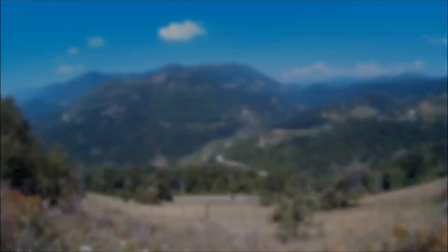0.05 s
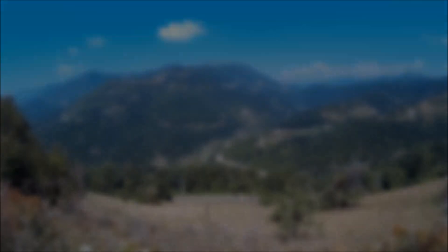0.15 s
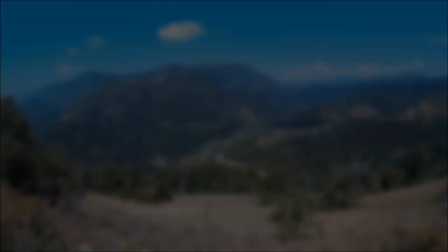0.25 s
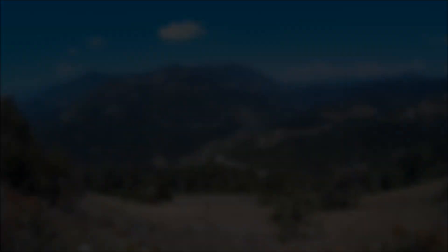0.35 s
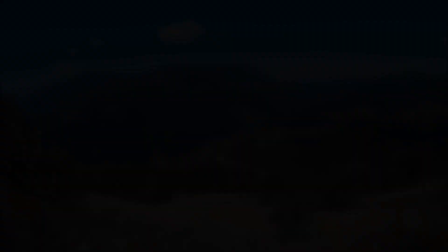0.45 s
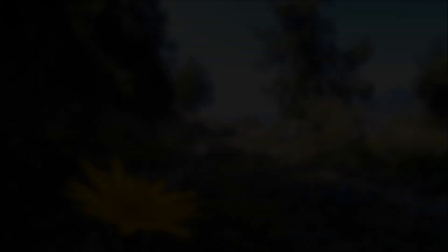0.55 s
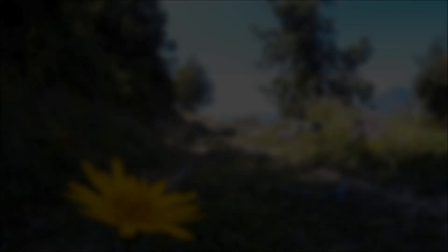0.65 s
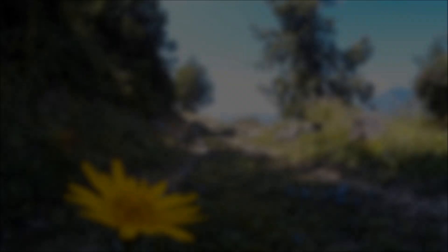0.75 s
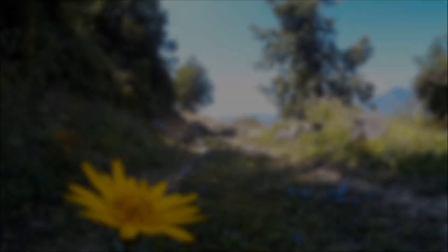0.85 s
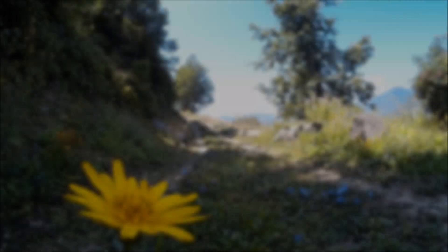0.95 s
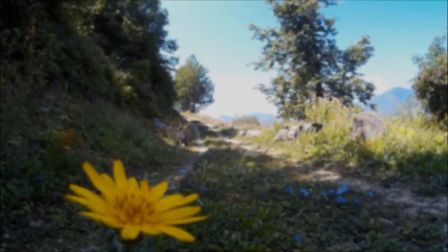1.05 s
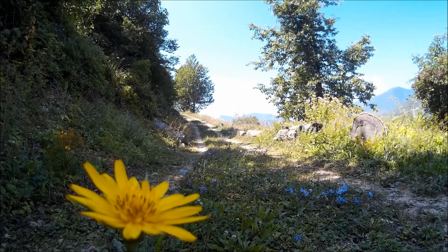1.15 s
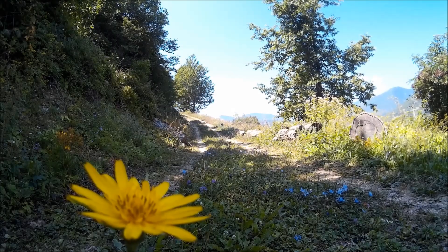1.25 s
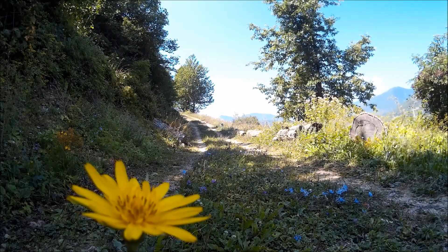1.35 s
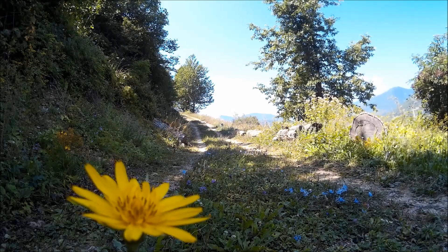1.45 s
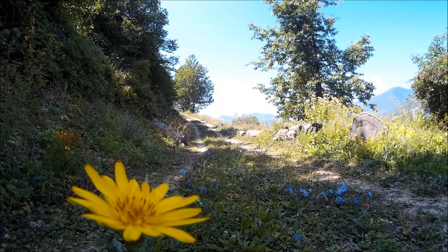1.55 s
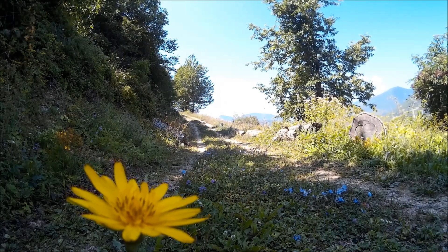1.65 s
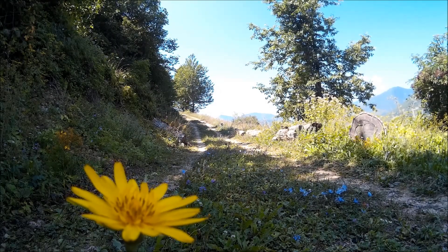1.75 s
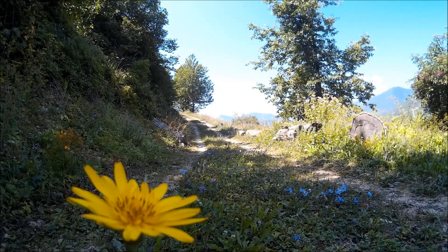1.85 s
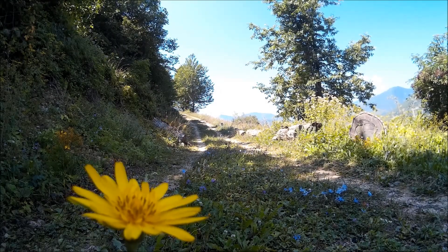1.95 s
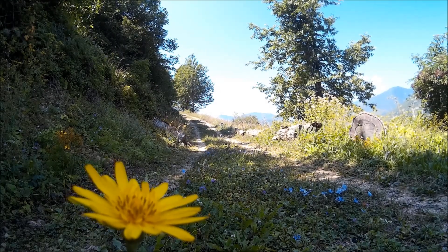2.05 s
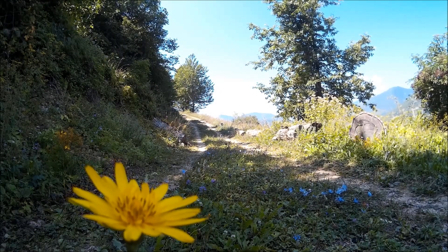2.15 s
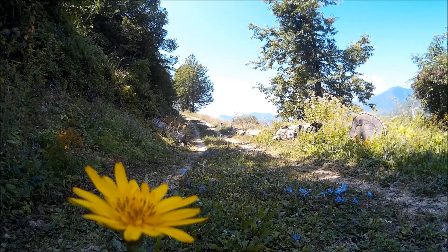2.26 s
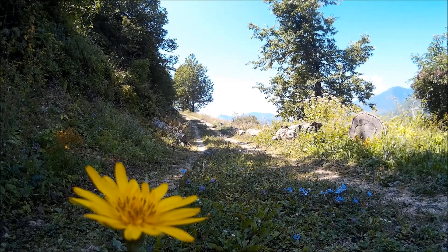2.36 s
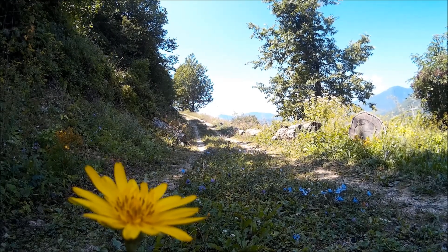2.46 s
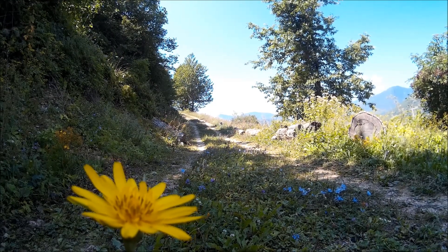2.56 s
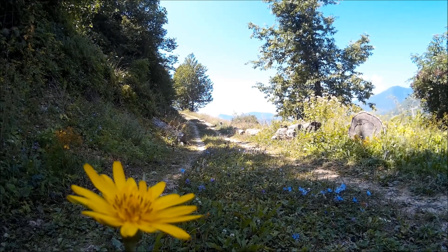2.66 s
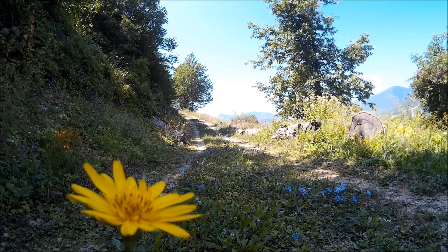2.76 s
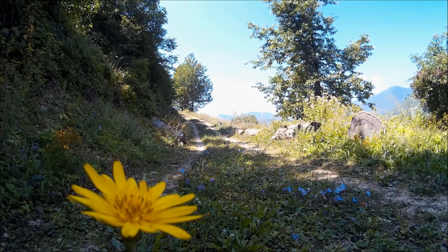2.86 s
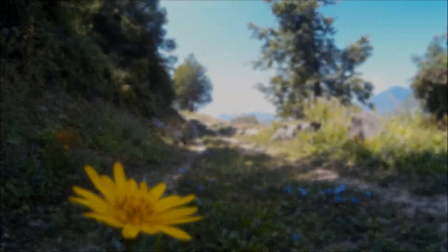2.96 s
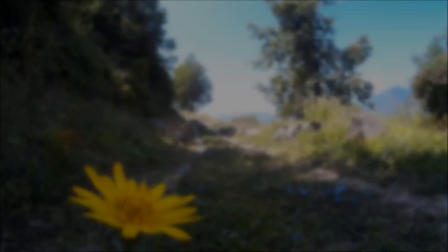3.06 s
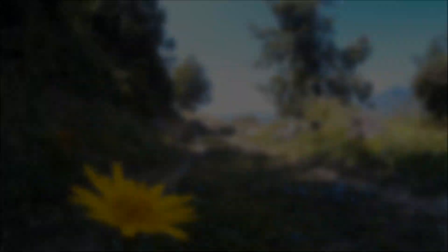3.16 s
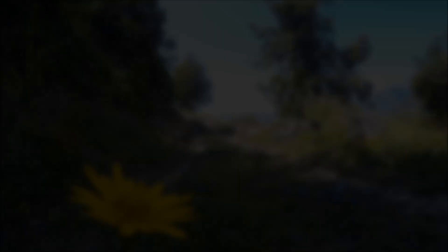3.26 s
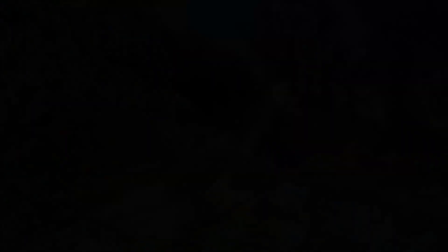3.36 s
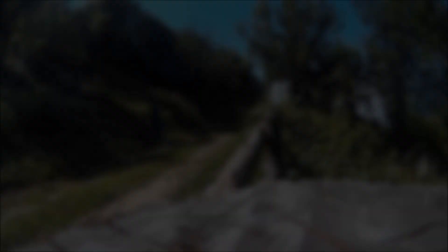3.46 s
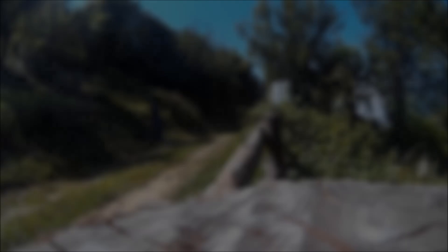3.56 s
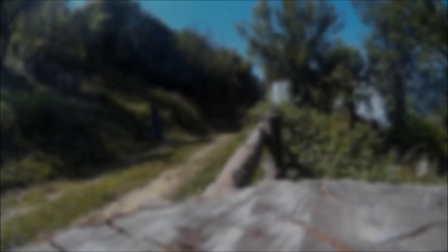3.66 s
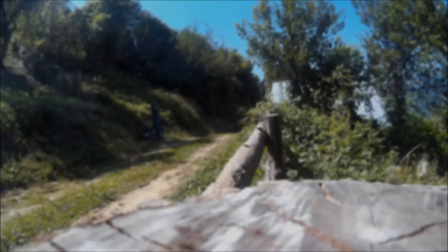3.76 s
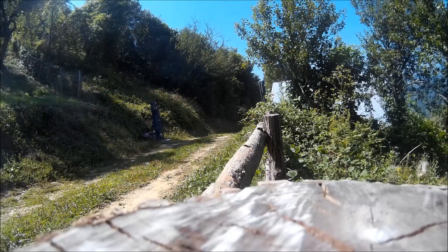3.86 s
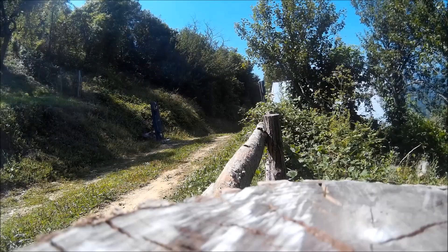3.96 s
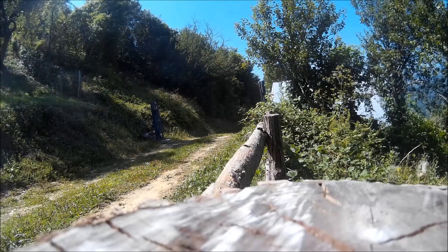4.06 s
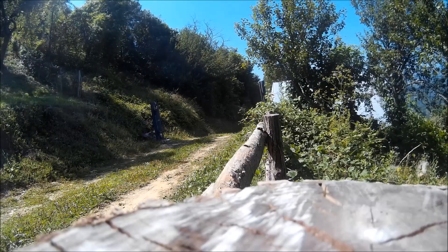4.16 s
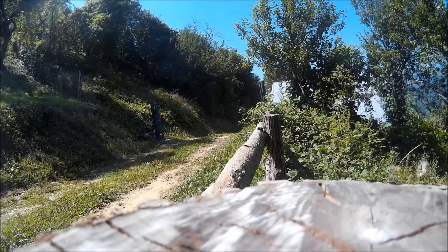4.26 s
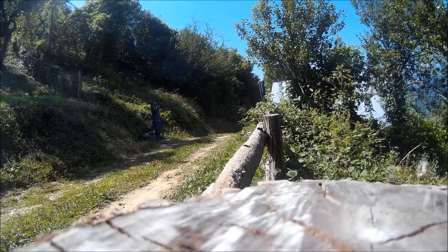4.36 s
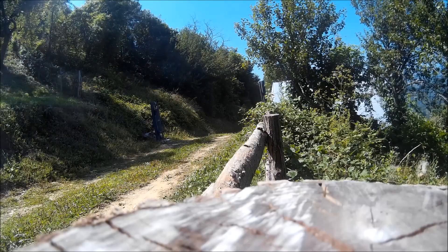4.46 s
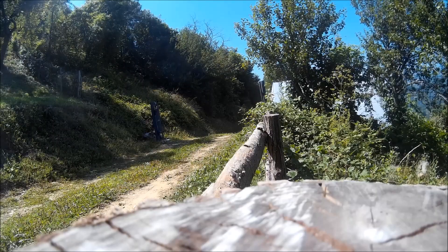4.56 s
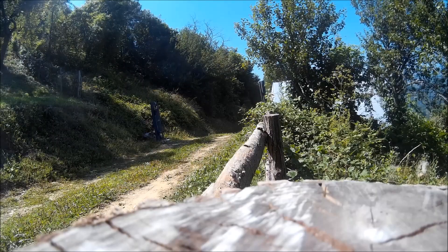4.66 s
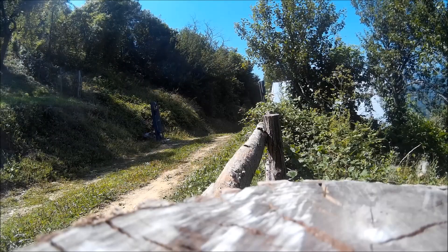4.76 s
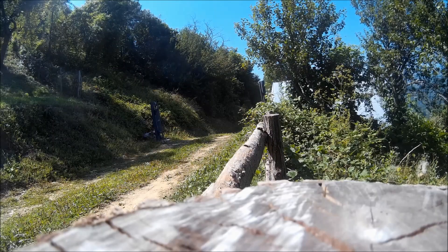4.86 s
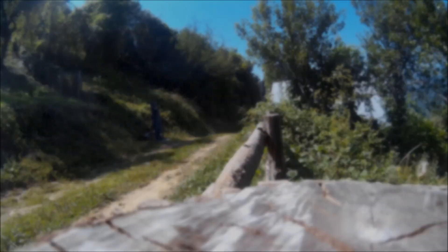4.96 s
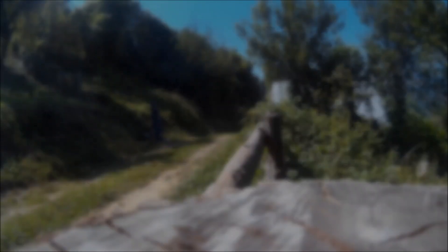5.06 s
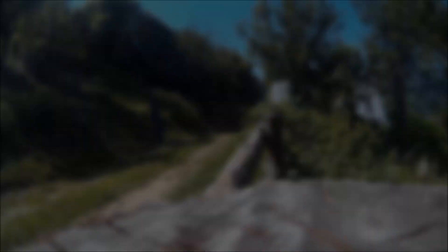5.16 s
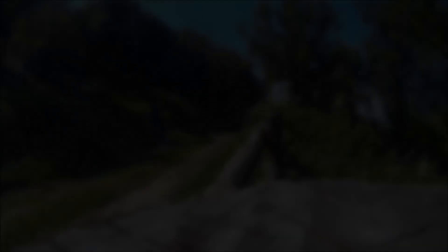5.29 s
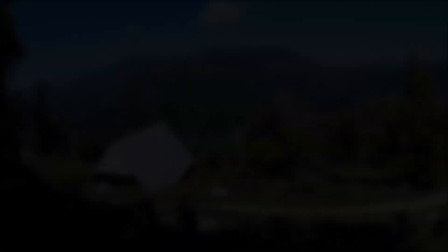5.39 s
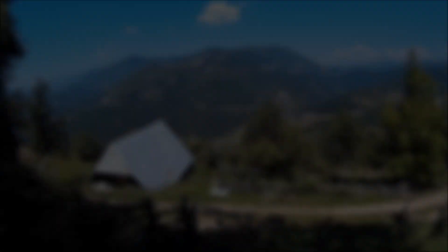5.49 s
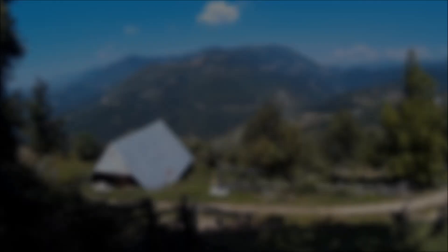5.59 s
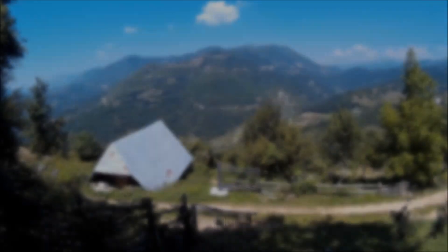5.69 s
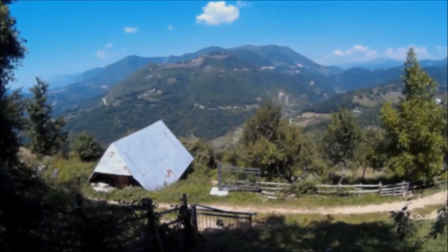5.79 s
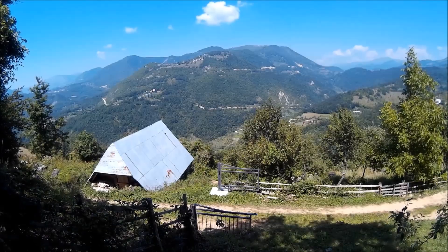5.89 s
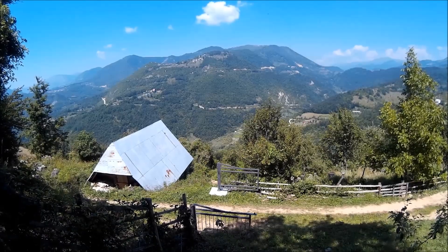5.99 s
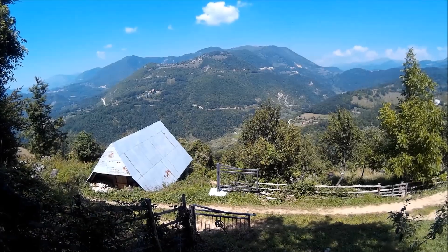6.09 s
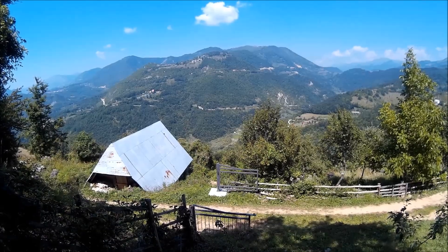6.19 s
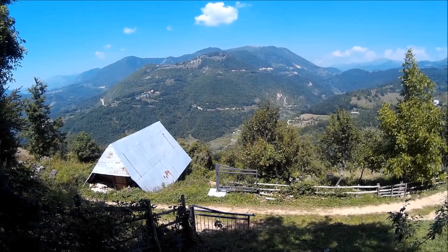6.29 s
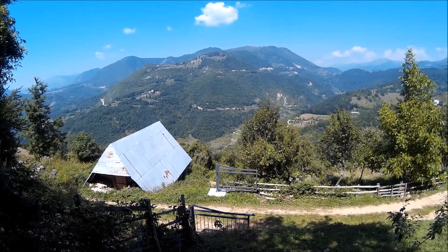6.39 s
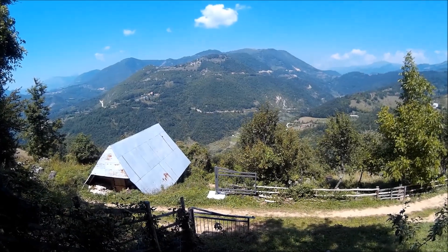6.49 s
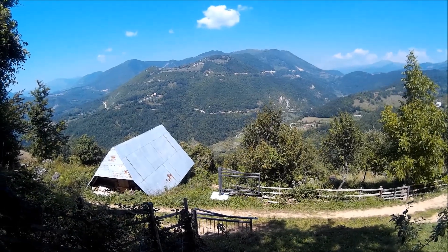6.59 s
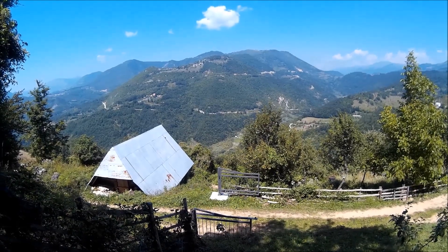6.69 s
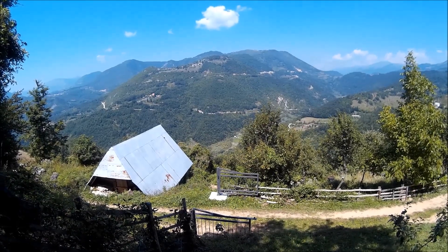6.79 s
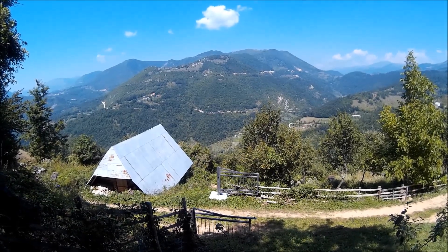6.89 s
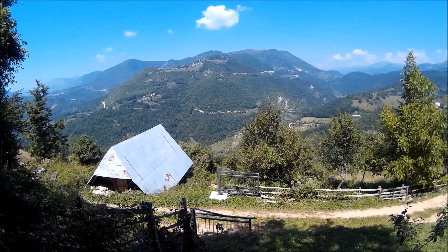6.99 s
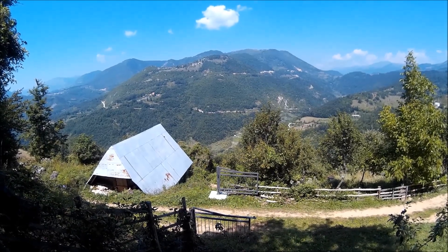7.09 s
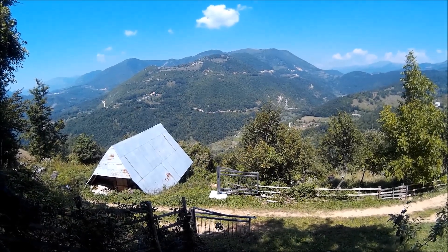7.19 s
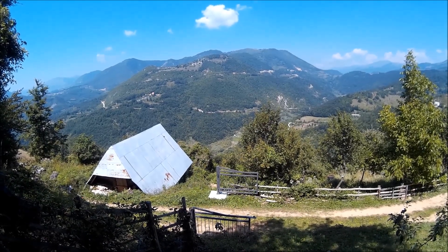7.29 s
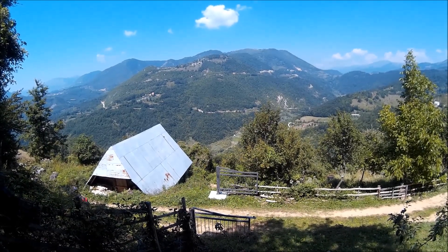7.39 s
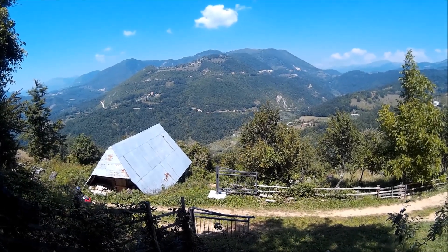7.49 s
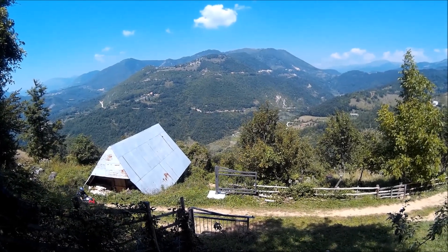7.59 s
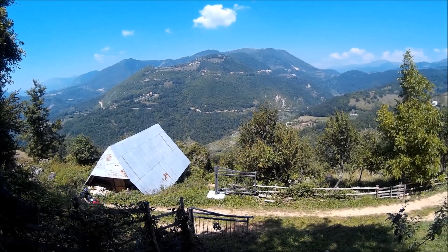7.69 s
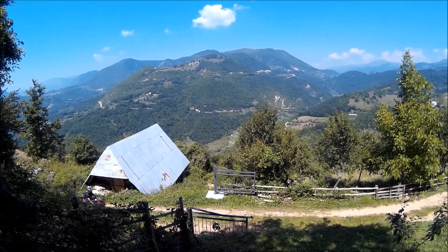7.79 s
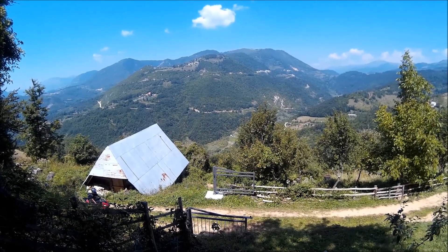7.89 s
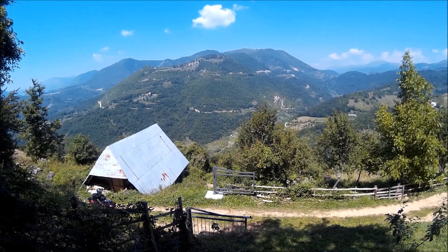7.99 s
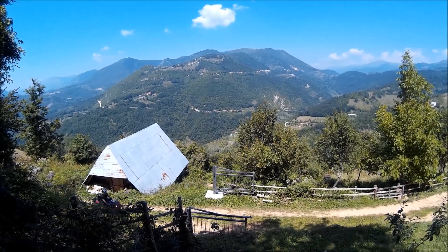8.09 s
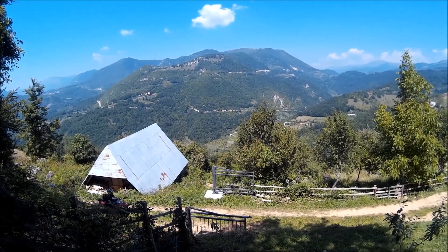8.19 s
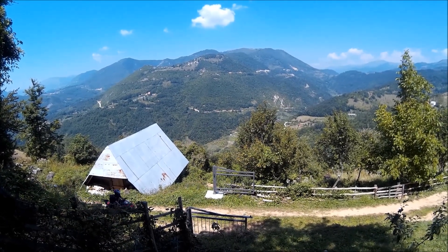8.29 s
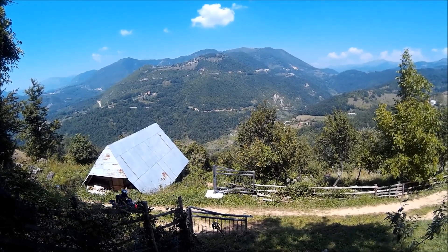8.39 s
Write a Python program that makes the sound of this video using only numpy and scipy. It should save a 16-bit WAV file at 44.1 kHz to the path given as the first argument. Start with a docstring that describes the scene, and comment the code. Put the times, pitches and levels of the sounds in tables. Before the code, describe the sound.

A quiet meadow in stereo: a near cricket and a fainter one alternate rapid, silvery chirps over hushed leaves and insects, with small ticks in grass and soft echoing birdsong. Midway, sound cuts out briefly and returns on a piercing clipped bird chirp. Later the insects sink away under a motorcycle's deep, fast, throbbing exhaust, growing steadily from far off to close, with a stone cracking and a light mechanical rattle.

```python
"""Two field crickets chirp on a summer hillside: gliding near-sine strokes with an octave and file noise.
Songbirds whistle as bent sines with tree echoes, over noise for murmur, wind, grass snaps and a dying far engine.
The sound drops out for an instant and returns on a loud clipped bird call with a noisy ringing of the trees.
The meadow then fades under a motorcycle that chugs closer: firing-rate orders plus growl, rattle and hiss.
A stone cracks under it: a click rings short modes."""
import sys
import numpy as np
from scipy import signal
from scipy.fft import rfft, irfft, next_fast_len
from scipy.io import wavfile
from scipy.ndimage import map_coordinates

SR = 44100
rng = np.random.default_rng(int(sys.argv[2]) if len(sys.argv) > 2 else 0)


def persist_wave(psi):
    """Save psi, clipped to +-1, as 16-bit WAV."""
    counts = np.round(np.clip(psi, -1, 1) * 32767).astype(np.int16)
    wavfile.write(sys.argv[1], SR, np.atleast_2d(counts).T)


N = 372204

# Murmur of far insects and leaves, before its swells: (time [s], level [dB])
MURMUR_LEVEL = [(0, -81.5), (.25, -82.5), (.82, -74.5), (2.6, -76), (3.1, -71.5), (3.5, -73.5),
                (5.8, -74.5), (6.0, -81.5), (6.5, -100.5)]
# Murmur spectrum: (frequency [Hz], relative density [dB per Hz])
MURMUR_COLOUR = [(120, -80), (200, -47.5), (571, -49.5), (1520, -32), (2630, -19.5), (3890, -14.5),
                 (4730, -9.5), (4990, -9), (5460, -19.5), (6400, -22), (9640, -23), (11900, -40.5),
                 (14000, -56.5)]

# Departing engine: (time [s], level [dB])
ENGINE_LEVEL = [(0, -62), (.18, -76), (.6, -90), (1.1, -99)]
# Departing engine spectrum: (frequency [Hz], relative density [dB per Hz])
ENGINE_COLOUR = [(12, -51), (20, -19), (38, -18), (53, -23), (91, 1), (188, -25), (216, -37), (456, -30),
                 (791, -34), (1150, -34.5), (2200, -41), (2860, -66), (4840, -120)]

# Wind spectrum: (frequency [Hz], relative density [dB per Hz])
WIND_COLOUR = [(8.8, -34), (15, -9.5), (43, 1), (62, -2.5), (80, -13), (113, -20.5), (400, -33),
               (520, -61.5), (880, -120)]
WIND_MEDIAN_DB = -91

# Cricket chirps, strokes ending on an even beat: (end of first stroke [s], end of last stroke [s],
# nominal pitch [Hz], nominal peak [dB], octave re tone [dB])
CHIRPS = [(0.034, .069, 4760, -57.5, -15), (.14, .256, 4980, -64, -38), (.314, .424, 4777, -47.5, -14.5),
          (.472, .512, 4930, -59.5, -40), (.607, .716, 4777, -44, -14.5), (0.751, .783, 5000, -56.5, -39),
          (.847, .952, 4786, -44, -13), (1.027, 1.027, 4540, -62, -27), (1.098, 1.2, 4773, -44.5, -11),
          (1.243, 1.285, 4960, -55, -35), (1.329, 1.328, 4520, -63, -24), (1.345, 1.43, 4760, -71, -32),
          (1.468, 1.613, 4950, -54.5, -33), (1.641, 1.755, 4783, -44.5, -13), (1.78, 1.892, 4990, -57, -30),
          (1.947, 2.019, 4776, -45, -11), (2.055, 2.126, 4980, -56, -34), (2.217, 2.287, 4760, -45, -11),
          (2.326, 2.368, 4980, -55, -33), (2.534, 2.639, 4785, -43.5, -13.5),
          (2.702, 2.755, 4440, -68, -21), (3.112, 3.215, 4780, -42.5, -11.5),
          (3.441, 3.547, 4780, -42, -12), (3.57, 3.647, 4900, -53.5, -37), (3.719, 3.823, 4760, -42, -12),
          (3.871, 3.953, 4960, -52.5, -35), (3.986, 4.088, 4784, -41, -12), (4.134, 4.246, 4960, -55, -22),
          (4.297, 4.403, 4800, -41.5, -12), (4.428, 4.501, 4970, -53.5, -29),
          (4.567, 4.568, 4420, -68, -22), (4.619, 4.726, 4820, -42, -10.5), (4.774, 4.775, 4990, -54, -36),
          (4.818, 4.818, 4600, -61, -26), (4.914, 5.017, 4803, -40.5, -11.5),
          (5.066, 5.107, 4960, -53.5, -37), (5.198, 5.302, 4810, -40, -12.5),
          (5.345, 5.385, 5050, -53, -37), (5.507, 5.614, 4795, -41, -11.5), (5.772, 5.878, 4995, -53, -32),
          (5.912, 5.911, 4400, -60, -22), (6.03, 6.132, 4764, -53.5, -7.5), (6.286, 6.388, 4770, -64, -8),
          (6.526, 6.627, 4690, -66.5, -10.5), (6.791, 6.894, 4830, -68, -11),
          (7.067, 7.17, 4820, -69.5, -10), (7.35, 7.455, 4740, -73, -9), (7.642, 7.743, 4740, -69.5, -12),
          (7.9, 7.995, 4740, -72, -7)]
# Build-up over the last strokes of a chirp: (stroke length [s], pitch factor, level [dB], octave [dB])
BUILD_UP = [(.02, .992, -3, 4), (.025, 1.0, -1.5, 2), (.026, .998, -1, .5), (.026, 1.004, -0.34, -0.5)]
# One stroke: (share of its length, pitch factor, tone [dB], octave [dB])
STROKE_SHAPE = [(0, 0.9, -29, -13.5), (0.118, 1.0, -5, -6.5), (.35, 0.99, -3.5, 0), (0.6, .98, -2, -4),
                (0.848, 0.9375, -0.5, -7), (0.949, 0.88, -14.5, -7), (1.078, 0.93, -17.5, -17.5)]
# Seats, the near cricket richer in octave and further right: (octave [dB], left re right [dB], length factor)
SEATS = [(-22, -2, 1), (-10, -5, 1.0)]
BEAT_S = 0.036  # nominal, stroke to stroke
SCRAPE_DB = -33  # file noise re tone, before its band-pass

# Passing bird notes: (time [s], length [s], start [Hz], middle [Hz], end [Hz], peak [dB rms],
# share of length at the peak)
NOTES = [(0.437, .07, 3900, 3380, 2880, -78, 0.27), (0.497, 0.11, 2750, 2640, 2440, -72, 0.083),
         (0.591, .26, 2520, 2333, 2244, -71, 0.16), (0.554, 0.063, 3060, 3130, 3480, -74.5, 0.92),
         (1.157, 0.26, 7600, 7620, 7510, -85.5, 0.33), (1.295, 0.067, 3500, 3160, 3290, -69.5, 0.38),
         (1.293, .13, 4006, 3990, 3970, -67.5, 0.38), (1.287, 0.084, 3540, 3660, 3610, -67.5, 0.2),
         (1.388, 0.24, 2600, 2095, 1683, -67.5, 0.058), (1.427, 0.048, 4220, 3640, 4160, -70, .55),
         (1.472, .04, 3980, 4270, 4150, -66, 0.43), (1.551, 0.062, 3370, 3420, 3300, -72, 0.26),
         (1.581, 0.061, 3000, 3300, 3500, -68, 0.87), (1.6, .14, 2470, 2100, 1750, -70, 0.068),
         (1.725, 0.051, 4080, 3680, 3980, -68, 0.43), (1.762, 0.051, 3880, 4280, 4300, -65.5, 0.74),
         (1.884, 0.067, 3230, 3250, 3500, -74.5, 0.44), (2.127, .08, 4116, 4160, 4159, -66.5, 0.55),
         (2.162, .395, 7680, 7530, 7620, -76.5, .9), (2.932, 0.018, 6308, 6450, 6440, -38, .3),
         (2.936, 0.0098, 7930, 8030, 8230, -38, 0.94), (2.951, 0.023, 4870, 4090, 3870, -29.5, 0.25),
         (3.395, 0.11, 2746, 2540, 2520, -64.5, 0.45), (3.499, 0.14, 2493, 2332, 2374, -57.5, 0.56),
         (3.652, 0.038, 2310, 2320, 2300, -71, .4), (4.061, .12, 2600, 2140, 1950, -70, .1),
         (4.439, 0.058, 2300, 2610, 2820, -81, .7), (4.532, 0.043, 1730, 1656, 1680, -81, 0.92),
         (4.57, 0.13, 1705, 2016, 1963, -67, 0.61), (4.788, .12, 2424, 2170, 2090, -64, 0.12),
         (4.892, .1, 2115, 1856, 1810, -67.5, 0.54), (5.452, 0.054, 2700, 2470, 2450, -78, .3),
         (5.574, 0.19, 2659, 2376, 2180, -78, 0.76), (7.322, 0.024, 4530, 4790, 5330, -64.5, .3),
         (7.327, 0.058, 3950, 4800, 4940, -67, 0.28), (7.375, 0.1, 4980, 4930, 4470, -66.5, 1),
         (7.906, .05, 7932, 7040, 6670, -65, 0.35), (8.026, 0.044, 3740, 3550, 3480, -70, 0.55),
         (8.222, 0.1, 4120, 4080, 4090, -56.5, 0.2), (8.225, 0.096, 3840, 3950, 3860, -66.5, .3),
         (8.3, 0.065, 4000, 4150, 3860, -56.5, .35), (8.422, 0.018, 4260, 4700, 5330, -61.5, .7)]
NOTE_START_DB, NOTE_END_DB = -7, -14  # re peak
NOTE_THIRD_DB = -47.5  # third harmonic re tone
# Starts of a near bird's hooked note: times [s]
HOOK_STARTS_S = [3.012, 3.162]
# Hooked note: (time after start [s], pitch [Hz], level [dB rms], third harmonic re tone [dB])
HOOK = [(0, 2936, -50.5, -60), (.008, 2277, -45.5, -61.5), (.017, 1963, -44.5, -59),
        (.025, 1945, -43.5, -63), (.04, 2450, -44, -58), (.054, 2760, -41.5, -53), (0.07, 2849, -34, -22),
        (.077, 2855, -32.5, -23.5)]
# Held whistle close by: (time [s], pitch [Hz], level [dB rms])
LONG_WHISTLE = [(2.1, 4160, -68), (2.108, 3905, -65.5), (2.156, 3850, -47.5), (2.248, 3671, -39),
                (2.324, 3635, -41), (2.516, 3679, -40.5), (2.544, 3706, -34), (2.57, 3460, -75.5)]

# Sends to the tree echo
CRICKET_ECHO_DB, NOTE_ECHO_DB, HOOK_ECHO_DB, LONG_ECHO_DB = -21, -10, -12.5, -25.5
TREES_T60_S, LEAF_SWAY_S = 0.37, 0.0001

# Rustles and chips in the grass: (time [s], body level at onset [dB rms], nominal centre [Hz],
# bright crackle re body [dB])
SNAPS = [(0.5022, -63, 3900, -25), (0.5838, -60.5, 2160, -11), (0.845, -63, 3670, -4),
         (0.86, -61, 3640, 1.5), (0.915, -52.5, 3900, -1), (0.985, -65.5, 3120, -10),
         (1.128, -59, 3450, -7), (1.9704, -54, 3900, -13), (2.6834, -71, 2240, -8),
         (3.3708, -61.5, 1980, -19), (3.7508, -64, 3530, 3), (3.9392, -63.5, 3450, -12),
         (4.137, -64.5, 3450, -18), (4.213, -57, 3210, -24), (4.549, -61, 3930, -20),
         (4.789, -73, 3020, -3), (4.849, -55, 4130, -8), (4.875, -62.5, 3900, -7), (4.99, -66, 3850, -11),
         (5.559, -62, 2350, -1), (5.6731, -57, 3800, -17), (5.7743, -60.5, 4200, -8),
         (6.9697, -71, 1950, 0)]
SNAP_T60_S = 0.089

SILENCE_START_S, SILENCE_END_S = 2.77, 2.9312

# Ringing of the trees after the loud call: (time [s], level [dB])
RINGING_LEVEL = [(2.9, -31), (2.934, -36.5), (2.942, -42), (2.956, -37.5), (2.986, -45.5), (3.09, -59.5),
                 (3.3, -100)]
# Ringing spectrum: (frequency [Hz], relative density [dB per Hz])
RINGING_COLOUR = [(880, -66), (1500, -49), (2150, -31.5), (3580, -18), (4750, -3.5), (5560, -7.5),
                  (6070, -22), (8050, -24.5), (10700, -60), (15500, -63)]

# Motorcycle: (time [s], firing rate [1/s], exhaust level [dB], first order re exhaust [dB], rattle [dB])
BIKE = [(5.5, 59.4, -90, 0, -104), (5.71, 62.7, -88, -1.5, -101), (5.89, 64.9, -83, -5, -112),
        (6.14, 63.5, -54.5, -1.5, -83.5), (6.45, 63.6, -39.5, -2, -67.5), (6.65, 63.6, -35.5, -1.5, -64.5),
        (6.74, 62.3, -35, -1, -64), (6.81, 63.5, -32.5, -5, -63), (7.1, 64.6, -32, -2.5, -57),
        (7.15, 63.9, -30.5, -0.5, -60), (7.3, 62.5, -29, -7.5, -57), (7.52, 62.5, -27, -3, -58.5),
        (7.61, 65.0, -26, -3.5, -55), (7.84, 64.8, -29.5, -1.5, -56), (7.87, 65.0, -25.5, -12.5, -55),
        (7.93, 65.3, -28, 0.5, -54), (7.96, 65.7, -25.5, -11.5, -55), (8.09, 66.4, -23.5, -4.5, -52.5),
        (8.2, 66.9, -24, -17.5, -54.5), (8.23, 67.0, -23.5, -7, -51), (8.29, 66.1, -26, -4.5, -53),
        (8.32, 66.4, -22.5, -5, -51), (8.4, 66.7, -22.5, -2, -52), (8.44, 66.9, -34.5, -15, -51.5)]
# Higher exhaust orders: (multiple, level re exhaust at the end [dB], gain while nearing [dB per s])
ORDERS = [(3, -9.5, 1.5), (4, -17.5, 1.5), (5, -23.5, 0.5), (6, -31, 2.5), (7, -35, 2.5), (8, -45, 1.5)]
SECOND_DB = -2  # re the power the first order leaves
GROWL_DB, GROWL_DB_PER_S = -10, -2  # re exhaust at the end; change on the way there
REBOUND_RAD = 0.6  # a pressure peak follows each suction pulse
# Growl spectrum: (frequency [Hz], relative density [dB per Hz])
GROWL_COLOUR = [(20, -43), (43, 5.5), (54, -19.5), (83, 9.5), (97, -6), (110, 6.5), (135, -4), (148, -2.5),
                (158, 2.5), (170, -4.5), (210, -13), (300, -13.5), (420, -23), (700, -57.5)]
# Rattle spectrum: (frequency [Hz], relative density [dB per Hz])
RATTLE_COLOUR = [(400, -1.5), (500, 8.5), (640, 2), (900, 2), (1060, 7), (1160, 1.5), (1280, 8.5),
                 (1450, -2), (1800, -9), (2500, -13.5), (2780, -13), (3100, -23), (5000, -28), (7000, -53)]
# Hiss heard with the motorcycle: (time [s], level [dB])
HISS_LEVEL = [(5.8, -112), (6.13, -88.5), (6.51, -75.5), (7.19, -70.5), (8.44, -74.5)]
# Hiss spectrum: (frequency [Hz], relative density [dB per Hz])
HISS_COLOUR = [(1760, -25), (3000, 0), (4620, 0.5), (6140, 1), (13600, -0.5), (15200, 16), (15800, 0)]

# Stone crack: (time [s], strength [dB])
STONE = [(6.564, -33)]
# Stone modes: (frequency [Hz], level re strength [dB], t60 [s])
STONE_MODES = [(985, 8, 0.0097), (1710, -4.5, 0.029), (2020, -7, 0.016), (2910, -2, 0.0058),
               (4050, -2, 0.00094)]

CUTOFF_HZ = 15950


def amp(db):
    """dB to gain."""
    return 10 ** (np.asarray(db) / 20)


def rms_one(x):
    """Scale to rms 1."""
    return x / np.sqrt(np.mean(x ** 2) + 1e-20)


def in_time(rows):
    """Columns of a table as curves over all samples."""
    s, *columns = np.transpose(rows)
    return [np.interp(np.arange(N) / SR, s, c) for c in columns]


def level(rows):
    """Gain curve of a (time [s], level [dB]) table, silent outside it."""
    t = np.arange(N) / SR
    return amp(in_time(rows)[0]) * (t >= rows[0][0]) * (t <= rows[-1][0])


def drift(rate_hz):
    """Slow random curve of rms 1: noise twice through a one-pole low-pass, at SR / 40."""
    r = np.exp(-80 * np.pi * rate_hz / SR)
    white = rng.standard_normal(N // 40 + 2002)
    slow = signal.lfilter([1], [1, -2 * r, r * r], white)[2000:]
    return np.interp(np.arange(N) / 40, np.arange(len(slow)), rms_one(slow))


def noise(spectrum):
    """Noise coloured by a (frequency [Hz], density [dB per Hz]) table; rms 1."""
    size = next_fast_len(N)
    hz, db = np.transpose(spectrum)
    bins_hz = np.arange(size // 2 + 1) * SR / size + 1  # +1 keeps the log finite
    gain = amp(np.interp(np.log(bins_hz), np.log(hz), db))
    return rms_one(irfft(rfft(rng.standard_normal(size)) * gain, size)[:N])


def band_pass(x, order, low_hz, high_hz):
    """Butterworth band-pass."""
    return signal.sosfilt(signal.butter(order, [low_hz, high_hz], "band", fs=SR, output="sos"), x)


def patchy(spectrum, patch_db, rate_hz):
    """Third-octave bands of coloured noise that swell and sink partly together, partly alone."""
    whites = [noise(spectrum), noise(spectrum)]  # alternate, so neighbouring bands differ
    edges_hz = 150 * 2 ** np.arange(0, 6.9, 1 / 3)
    together = 0.4 * drift(rate_hz)
    out = np.zeros(N)
    for k, (low_hz, high_hz) in enumerate(zip(edges_hz, edges_hz[1:])):
        swell = amp(patch_db * (together + drift(rate_hz)))
        out += swell * band_pass(whites[k % 2], 2, low_hz, high_hz)
    return out


def add(out, s, x):
    """Mix x into out from time s."""
    i = round(s * SR)
    out[..., i:i + x.shape[-1]] += x[..., :N - i]


def murmur():
    """Many far insects and leaves blur into patchy noise; an opposed part widens it."""
    gain = level(MURMUR_LEVEL) * amp(0.52 * drift(2.5))
    leaves = patchy(MURMUR_COLOUR, 3.8, 12)
    side = amp(-4.5) * noise(MURMUR_COLOUR) * [[1], [-1]]
    return gain * (leaves + side)


def departing_engine():
    """Low coloured noise that dies away."""
    return level(ENGINE_LEVEL) * noise(ENGINE_COLOUR)


def wind():
    """Turbulence: low noise of drifting level."""
    return amp(WIND_MEDIAN_DB + 2.7 * drift(8)) * noise(WIND_COLOUR)


def strokes():
    """Unfold chirps into (start [s], length [s], pitch [Hz], level [dB], octave [dB], left re right [dB])."""
    octaves_db, pans_db, stretches = np.transpose(SEATS)
    for first, last, hz, db, octave_db in CHIRPS:
        ends = np.linspace(first, last, round((last - first) / BEAT_S) + 1)
        pan_db = np.interp(octave_db, octaves_db, pans_db)
        stretch = np.interp(octave_db, octaves_db, stretches)
        for k, end in enumerate(ends):
            # counted from the last stroke: short chirps lack the first rows
            row = BUILD_UP[max(k - len(ends), -len(BUILD_UP))]
            length, factor, more_db, more_octave_db = row
            length = length * stretch
            yield end - length, length, hz * factor, db + more_db, octave_db + more_octave_db, pan_db


def crickets():
    """Each wing closing is a near sine that swells while the file slows and the pitch sags."""
    out = np.zeros((2, N))
    share, factor, tone_db, octave_shape_db = np.transpose(STROKE_SHAPE)
    waver = amp(2.3 * drift(170))  # uneven teeth of the file
    scrape = band_pass(rng.standard_normal(N), 8, 3000, 10800)
    for s, length, hz, db, octave_db, pan_db in strokes():
        u = np.arange(round(share[-1] * length * SR)) / (length * SR)
        phase = np.cumsum(2 * np.pi * hz * np.interp(u, share, factor) / SR)
        grit = amp(SCRAPE_DB) * scrape[round(s * SR):][:len(u)]
        tone = amp(np.interp(u, share, tone_db)) * (np.sin(phase) + grit)
        octave = amp(np.interp(u, share, octave_shape_db) + octave_db) * np.sin(2 * phase)
        gains = amp(db + np.array([[pan_db / 2], [-pan_db / 2]]))
        add(out, s, gains * (tone + octave) * signal.windows.tukey(len(u), 0.1))
    return out * waver


def trees(x):
    """Scatter from trunks and slopes: a dense tail that dies away."""
    t = np.arange(round(0.7 * SR)) / SR
    tail = rng.standard_normal(len(t)) * amp(-60 * t / TREES_T60_S) * np.minimum(t / 0.0014, 1)
    # leaves soak up the treble
    tail = signal.sosfilt(signal.butter(4, 6000, fs=SR, output="sos"), tail)
    wet = signal.fftconvolve(x, tail / np.sqrt(np.sum(tail ** 2)))[:N]
    # moving leaves blur the pitch
    stirred = np.arange(N) + LEAF_SWAY_S * SR * drift(40)
    return map_coordinates(wet, [stirred], order=3, mode="nearest")


def whistle(out, s, t, hz, db, third_db=-99):
    """Add a gliding near sine with soft edges; t runs from the start of the note."""
    phase = np.cumsum(2 * np.pi * hz / SR)
    edges = np.clip(np.minimum(t, t[-1] - t) / 0.0043, 0, 1)
    wave = np.sin(phase) + amp(third_db) * np.sin(3 * phase)
    add(out, s, np.sqrt(2) * amp(db) * edges * wave)


def birds():
    """Gliding near-sine whistles with a slight flutter; returns the song and its echo send."""
    notes, hooks, held = np.zeros((3, N))
    for s, length, start_hz, middle_hz, end_hz, peak_db, peak in NOTES:
        t = np.arange(0, length, 1 / SR)
        u = t / length
        # parabola through the three pitches
        hz = start_hz * (1 - u) * (1 - 2 * u) + middle_hz * (2 * u) * (2 - 2 * u) + end_hz * u * (2 * u - 1)
        shape_db = np.interp(u, [0, np.clip(peak, 0, 1), 1], [NOTE_START_DB, 0, NOTE_END_DB])
        whistle(notes, s, t, hz, peak_db + shape_db, NOTE_THIRD_DB)
    for out, starts, shape in [(hooks, HOOK_STARTS_S, HOOK), (held, [LONG_WHISTLE[0][0]], LONG_WHISTLE)]:
        at, *columns = np.transpose(shape)
        t = np.arange(0, at[-1] - at[0], 1 / SR)
        for s in starts:
            whistle(out, s, t, *[np.interp(t + at[0], at, c) for c in columns])
    flutter = amp(1.5 * drift(90))
    notes = notes * amp(2.0 * drift(25))  # far notes come and go on the air
    song = flutter * (notes + hooks + held)
    sent = amp(NOTE_ECHO_DB) * notes + amp(HOOK_ECHO_DB) * hooks + amp(LONG_ECHO_DB) * held
    return song, sent


def snaps():
    """A short noise puff around a centre pitch, with a briefer bright crackle."""
    out = np.zeros(N)
    t = np.arange(round(0.06 * SR)) / SR
    onset = np.minimum(t / 0.0002, 1)
    for s, db, hz, bright_db in SNAPS:
        puff = rng.standard_normal(len(t))
        body = rms_one(band_pass(puff, 2, hz / 1.146, hz * 1.1))
        bright = rms_one(band_pass(puff, 5, 3500, 8800))
        body = amp(-60 * t / SNAP_T60_S) * body
        crackle = amp(bright_db - 120 * t / SNAP_T60_S) * bright  # dies twice as fast
        add(out, s, amp(db) * onset * (body + crackle))
    return out


def dropout():
    """Gain that falls to nothing for an instant and returns."""
    t = np.arange(N) / SR
    before = np.clip((SILENCE_START_S - t) / 0.0051, 0, 1)
    after = np.clip((t - SILENCE_END_S) / 0.0015, 0, 1)
    return before + after


def tree_ringing():
    """Dense scatter of the loud call: a dying burst of coloured noise."""
    return level(RINGING_LEVEL) * noise(RINGING_COLOUR)


def motorcycle():
    """Exhaust orders on the firing rate; uneven firing makes them waver and growls between them."""
    rate_hz, level_db, first_db, rattle_db = in_time(BIKE)
    to_go_s = np.arange(N) / SR - BIKE[-1][0]  # negative until the end
    rest_db = 10 * np.log10(np.clip(1 - amp(2 * first_db), 0.08, 1))  # power the first order leaves
    phase = np.cumsum(2 * np.pi * rate_hz / SR) + 0.06 * drift(12)
    orders = [(1, level_db + first_db), (2, level_db + rest_db + SECOND_DB)]
    orders += [(k, level_db + db + db_per_s * to_go_s) for k, db, db_per_s in ORDERS]
    # strong and weak firings, shared by all orders
    throb_db = 0.8 * drift(9) + 0.9 * drift(30)
    # orders in step make one suction pulse a firing; ground echoes let each slip a little
    exhaust = np.zeros(N)
    for k, db in orders:
        gain = amp(db + throb_db + 1.2 * drift(12))
        slip_rad = 0.3 * drift(4)
        exhaust -= np.sqrt(2) * gain * np.cos(k * phase + REBOUND_RAD + slip_rad)
    growl_db = level_db + GROWL_DB + GROWL_DB_PER_S * to_go_s + 1.1 * drift(7.8)
    growl = amp(growl_db) * noise(GROWL_COLOUR)
    beat = 1 + 0.044 * np.cos(phase)  # mechanical noise swells with each firing
    rattle = amp(rattle_db) * beat * patchy(RATTLE_COLOUR, 1.8, 12)
    hiss = level(HISS_LEVEL) * noise(HISS_COLOUR)
    return (exhaust + growl + rattle + hiss) * (np.arange(N) > BIKE[0][0] * SR)


def ring(clicks, hz, t60_s):
    """Resonator: a unit click sets a decaying sine of height 1 ringing."""
    r, w = amp(-60 / (t60_s * SR)), 2 * np.pi * hz / SR
    return signal.lfilter([0, np.sin(w)], [1, -2 * r * np.cos(w), r * r], clicks + 1e-18)


def stone():
    """One hard crack ringing a few short modes of alternating sign."""
    s, strength_db = STONE[0]
    click = np.zeros(N)
    click[round(s * SR)] = amp(strength_db)
    return sum((-1) ** k * amp(db) * ring(click, hz, t60_s) for k, (hz, db, t60_s) in enumerate(STONE_MODES))


def scene():
    """Stereo meadow with its dropout, and the motorcycle and stone in the middle."""
    low = departing_engine() + wind()
    chirps, (song, sent), ticks = crickets(), birds(), snaps()
    echo = trees(sent + amp(NOTE_ECHO_DB) * ticks + amp(CRICKET_ECHO_DB) * chirps.mean(axis=0))
    meadow = murmur() + low + chirps + song + ticks + echo + tree_ringing()
    return dropout() * meadow + motorcycle() + stone()


def record(dry):
    """Steep low-pass: the top is cut."""
    return signal.sosfilt(signal.cheby2(12, 70, CUTOFF_HZ, fs=SR, output="sos"), dry)


dry = scene()
out = record(dry)
persist_wave(out)
```